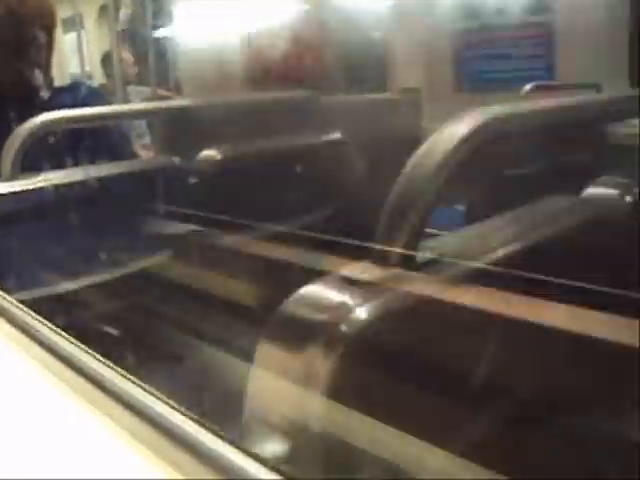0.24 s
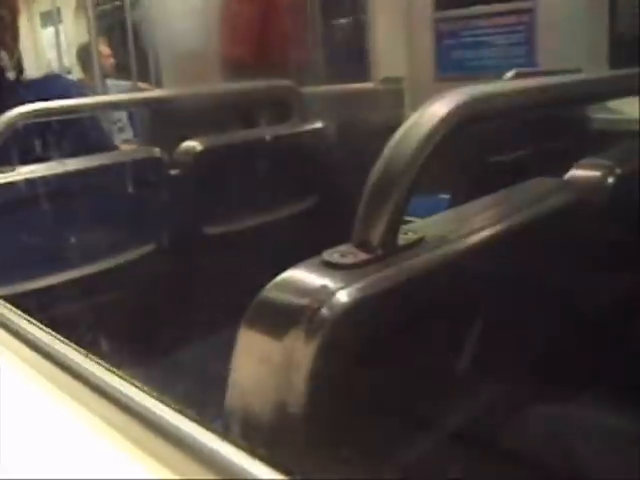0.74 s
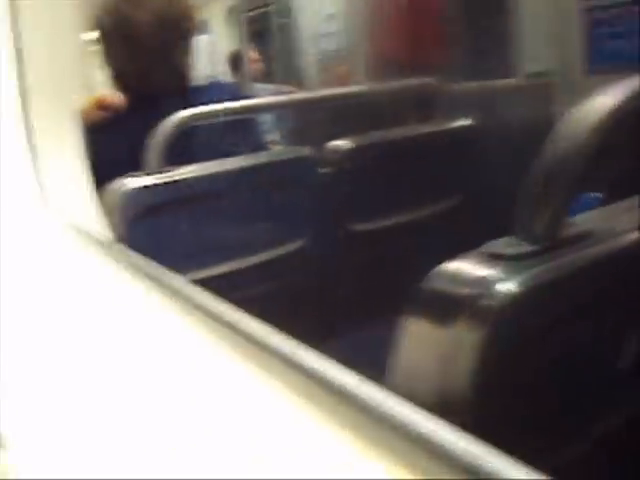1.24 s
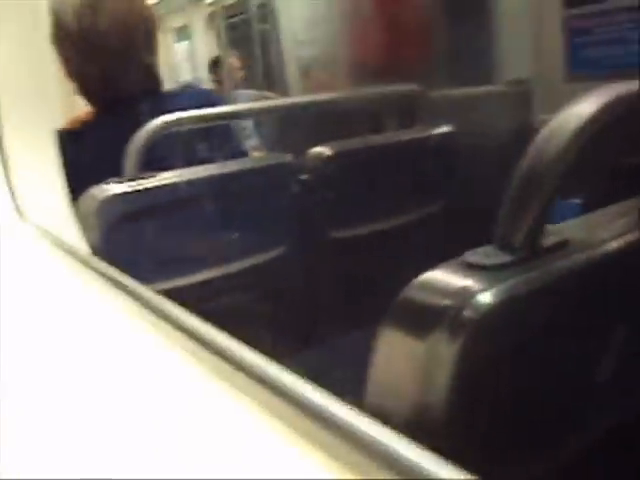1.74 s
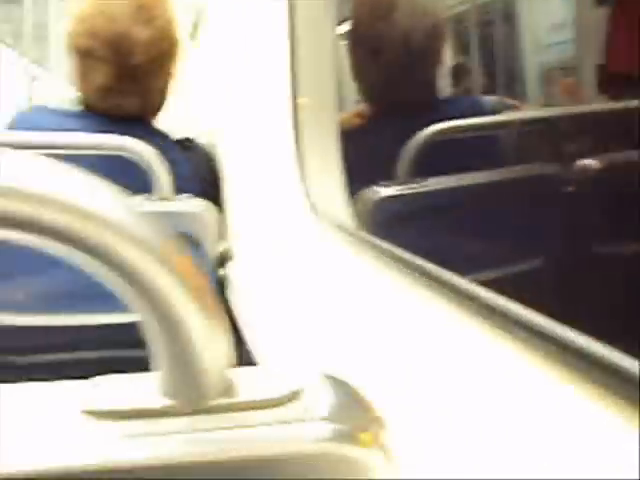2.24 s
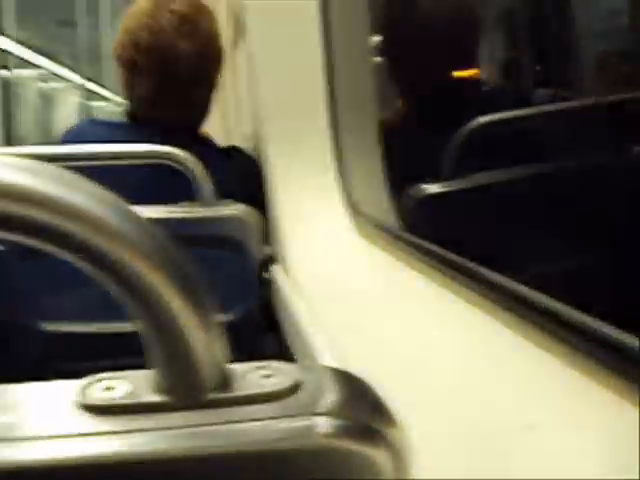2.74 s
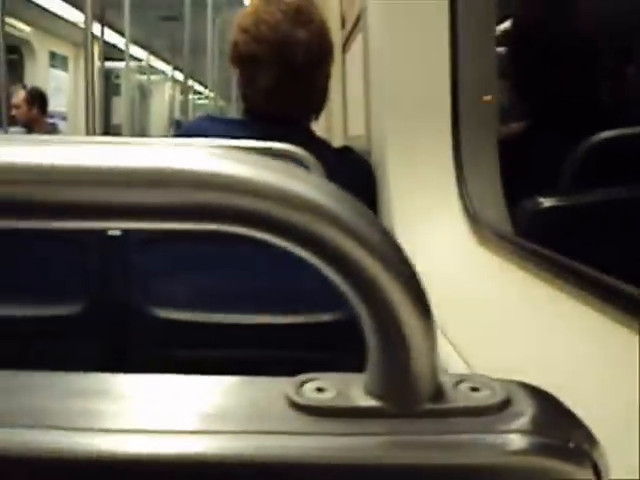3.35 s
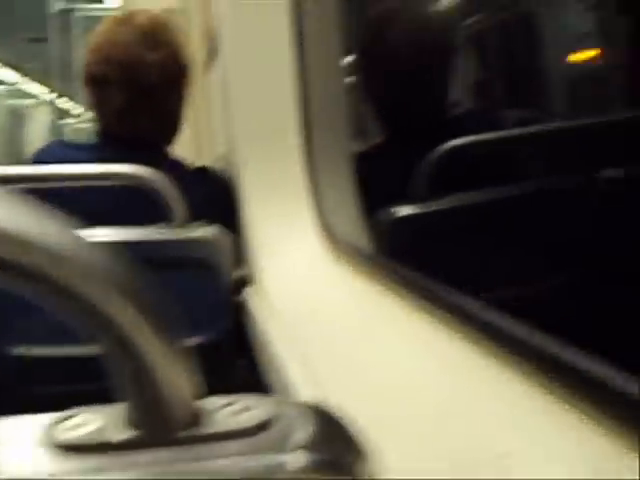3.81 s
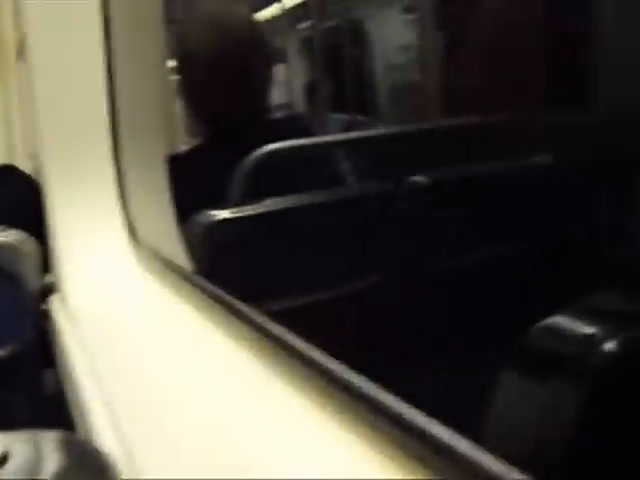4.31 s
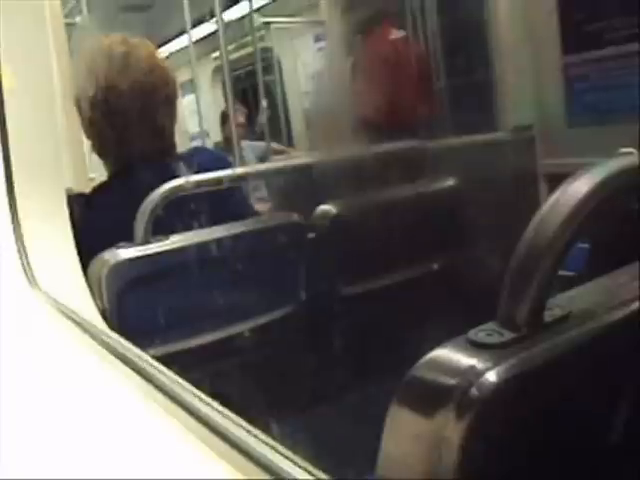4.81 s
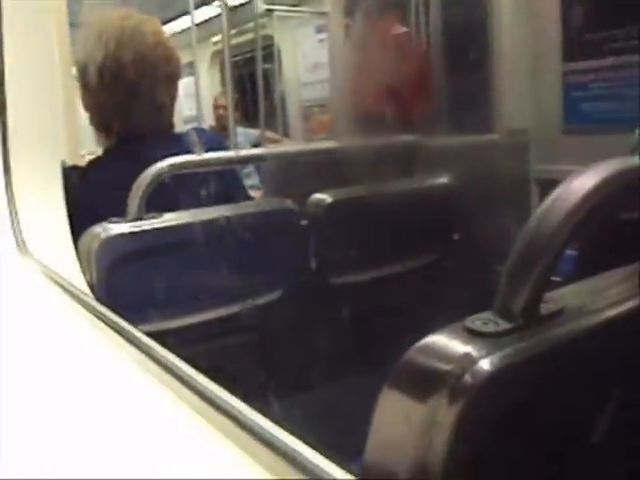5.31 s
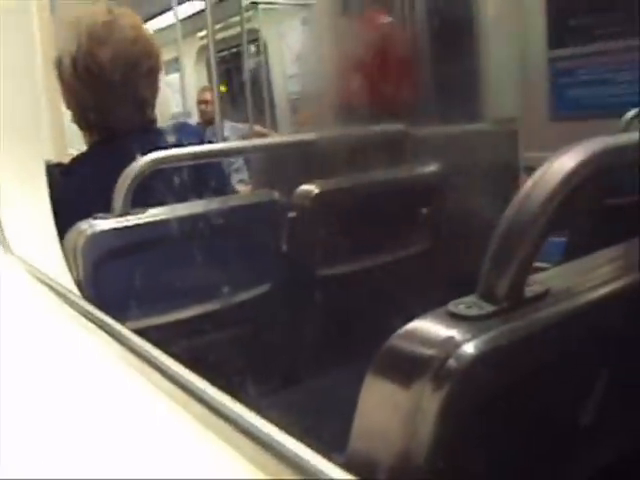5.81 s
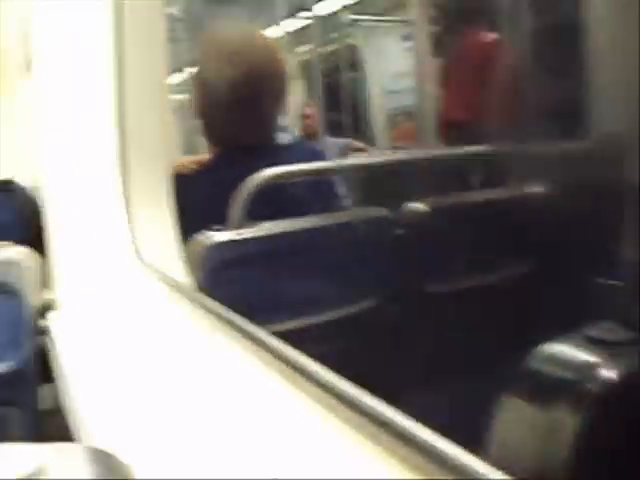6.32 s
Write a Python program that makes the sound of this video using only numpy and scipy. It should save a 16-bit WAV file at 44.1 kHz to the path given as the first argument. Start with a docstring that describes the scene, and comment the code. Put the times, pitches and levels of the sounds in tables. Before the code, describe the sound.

The interior of a subway car speeding through a tunnel, heard from a window seat. At 0 s a mid-low panel drone and muffled roar are already running, fluttering with a quick cluster of small jolts in the first half second. The sound dips slightly near 1 s, then builds; from about 1.8 s a hollow, wavering howl joins, with brighter rail hiss, staying prominent through 2-3 s and peaking near 3.7 s with a low thump. From about 4 s the howl recedes while the cabin boom surges, denser and louder, with hard jolts around 4.1, 4.3, 5.0, 5.8 and 6.4 s and heavy thumps near 4.4 and 5.5 s. Brief lulls make it uneven. The strained microphone crackles finely, with dry bursts mostly after 3.3 s, plus grain and thin sizzle. The ride is still loud when it cuts off around 6.6 s.

```python
"""Inside a subway car running through a tunnel, at a window seat: a booming ride that grows louder, with jolts.
Rolling noise excites the resonances of floor, wall panels and panes; roar, howl and hiss enter by the windows.
The bogies rumble below. Each source is filtered noise under a level curve; jolts and thumps add brief tones.
Loose fittings tick finely on the deep troughs of the wave; the strained recorder crackles in dry bursts as it
overloads; its microphone bends the wave, and its slow converter adds grain and a thin sizzle."""
import sys
import numpy as np
from scipy import signal
from scipy.fft import rfft, irfft
from scipy.io import wavfile
from scipy.ndimage import uniform_filter1d, map_coordinates

SR = 44100
rng = np.random.default_rng(int(sys.argv[2]) if len(sys.argv) > 2 else 0)


def pcm_store(signal):
    """Save signal as 16-bit PCM."""
    levels = np.round(np.clip(np.atleast_2d(signal), -1, 1) * 32767)
    wavfile.write(sys.argv[1], SR, levels.astype(np.int16).T)


N = 289296  # samples
TIME = np.arange(N) / SR  # s
HZ = np.fft.rfftfreq(N, 1 / SR)


def gain_of(db):
    """Decibel law: amplitude factor of a level."""
    return 10 ** (np.asarray(db) / 20)


def curve(points):
    """Linear interpolation: value at every moment from (time [s], value) points."""
    return np.interp(TIME, *np.transpose(points))


def shape(points):
    """Spectral envelope: gain at every frequency from (frequency [Hz], level [dB]) points."""
    hz, db = np.transpose(points)
    return gain_of(np.interp(np.log(HZ + 1), np.log(hz + 1), db, right=-100))


def ringing(modes):
    """Modal superposition: the powers of damped resonances add; amplitude halves one width off each centre."""
    power = sum((gain_of(db) / (1 + ((HZ - hz) / width) ** 2)) ** 2 for hz, width, db in modes)
    return np.sqrt(power)


def lowpass(corner_hz):
    """Gaussian low-pass gain, which makes noise into a slow random drift."""
    return np.exp(-(HZ / corner_hz) ** 2)


def noise(colour, steady_s):
    """Filtered white noise of power 1; dividing by its running RMS leaves only variation within steady_s."""
    x = irfft(rfft(rng.standard_normal(N)) * colour, N)
    size = max(int(steady_s * SR), 256)
    power = uniform_filter1d(uniform_filter1d(x ** 2, size), size)
    return x / np.sqrt(power + 1e-20)


def wandering(x, share, rate_hz):
    """Frequency modulation by a varying delay: the pitch drifts at random by a share of itself."""
    drift = noise(lowpass(rate_hz), steady_s=2.27)
    lag = np.cumsum(share * (drift - drift.mean()))  # samples
    return map_coordinates(x, [np.arange(N) + lag], order=1, mode="wrap")


def bump(s, length_s):
    """Raised-cosine envelope: a smooth rise to 1 at time s and back, length_s wide at half height."""
    return np.cos(np.pi / 2 * np.minimum(abs(TIME - s) / length_s, 1)) ** 2


def jolted(x, events, takeover):
    """Transient excitation: each bump replaces a share of the noise x by a tone of unsteady pitch."""
    wobble, wobble_hz = .055, 45  # share of the pitch, and rate
    clock = TIME + wobble * np.cumsum(noise(lowpass(wobble_hz), steady_s=0.1995)) / SR
    for s, hz, peak_db, length_s in events:
        surge = bump(s, length_s)
        tone = np.sin(2 * np.pi * (hz * clock + rng.random()))
        x = x * (1 - takeover * surge) + gain_of(peak_db) * surge * tone
    return x


# how hard the wheels roll: (time [s], level re the loud stretch [dB])
ROLLING = [(0, -9.5), (.35, -6.5), (1.0, -7.5), (1.4, -5), (2.05, -4), (2.35, -6.5), (2.65, -5),
           (3.1, -5.5), (3.5, -1.3), (3.75, -3), (4.1, 0), (5.2, 1.7), (5.65, 0), (6.3, 1.5), (6.56, -0.5)]


def driven(loud_db, slope):
    """Power law of level: a layer at loud_db in the loud stretch gains slope dB per dB of rolling."""
    return gain_of(loud_db + slope * curve(ROLLING))


# brief dips of the rumble: (time [s], change [dB], width at half height [s])
LULLS = [(0.165, -10, 0.015), (0.29, -6, 0.027), (0.61, -0.5, 0.021), (1.02, -1.5, 0.039),
         (1.284, -3, 0.031), (2.153, -2, 0.035), (2.896, -4.5, 0.056), (3.59, -1, 0.037),
         (3.884, -0.5, .035), (4.23, -1, 0.084), (4.73, -2.5, 0.095), (5.03, -0.5, 0.046),
         (5.3, -1.5, 0.027), (5.755, -7.5, 0.015), (6.264, -3.5, 0.05), (6.514, -10, 0.028)]


def lulls():
    """Amplitude modulation: change of level in dB at every moment, from the brief dips."""
    return sum(db * bump(s, length_s) for s, db, length_s in LULLS)


# colour of the trough crackle: (frequency [Hz], density [dB per Hz])
TROUGH_COLOUR = [(1000, -14), (2500, -3), (4000, 4), (5500, 3), (7000, -12)]


def trough_crackle(rumble):
    """One-sided excitation: loose fittings tick finely on the deep troughs of the wave, where the car swings
    hardest."""
    threshold = 1.3  # depth in units of the rumble's running RMS
    ticks_per_s, spread_db, decay_s = 420, 1.2, 0.0005  # mean rate, scale of the random sizes, decay
    depth = -rumble / np.sqrt(uniform_filter1d(rumble ** 2, size=SR // 2))
    excess = np.maximum(depth - threshold, 0) ** 2
    rate = ticks_per_s * excess / excess.mean()
    sizes = gain_of(spread_db * np.minimum(rng.exponential(1, N), 3))
    hits = (rng.random(N) < rate / SR) * sizes
    # each hit starts an exponential decay of power, filled with noise
    power = signal.lfilter([1], [1, -np.exp(-2 / (decay_s * SR))], hits ** 2 + 1e-18)
    ticks = irfft(rfft(np.sqrt(power) * rng.standard_normal(N)) * shape(TROUGH_COLOUR), N)
    return driven(loud_db=-62, slope=0.8) * ticks / np.std(ticks)


def add(mix, s, sound):
    """Linear superposition: mixes a sound in at time s."""
    part = mix[max(round(s * SR), 0):][:len(sound)]
    part += sound[:len(part)]


# bursts of dry crackle: (time [s], level at which the tail starts [dB], tail decay [s])
CRACKLES = [(1.341, -47, .004), (1.828, -46, .008), (2.335, -43, .008), (3.332, -38, .003),
            (3.348, -42, .003), (3.491, -43, .006), (3.965, -41, .004), (4.325, -38, .003),
            (4.331, -31, .0055), (4.605, -35, .0045), (4.993, -44, .006), (5.105, -40, .004),
            (5.346, -40, .006), (5.579, -41, .004), (5.785, -42, .006), (6.36, -38.5, .007),
            (6.376, -41, .007)]
# colour of a crackle: (frequency [Hz], density [dB per Hz])
CRACKLE_COLOUR = [(500, 11), (1500, 8), (3000, 1), (4200, -2), (5500, -2), (7000, -6)]


def crackles():
    """Overload with two decays: the recorder bursts into dry crackle, a sharp onset and a tail of equal start."""
    onset_s = 0.00037  # decay of the onset
    level, t = np.zeros(N), np.arange(SR // 10) / SR
    for s, tail_db, decay_s in CRACKLES:
        add(level, s, gain_of(tail_db) * (np.exp(-t / decay_s) + np.exp(-t / onset_s)))
    return level * noise(shape(CRACKLE_COLOUR), steady_s=.01)


# how hard the bogies shake, before the sway: (time [s], level [dB])
SHAKE_LEVEL = [(0, -37.5), (.9, -34.5), (1.4, -33.5), (2.2, -32), (2.75, -28), (3.2, -33), (3.6, -28.5),
               (4.5, -31), (5.6, -29.5), (6.56, -30.5)]
# colour of the rumble: (frequency [Hz], density [dB per Hz])
RUMBLE_COLOUR = [(5, -6), (24, -1), (42, 0.5), (58, 5), (75, -2.5), (98, 0.5), (125, -4), (160, -1.5),
                 (230, -23), (500, -57)]
# bumps that thump the bogies: (crest time [s], ring [Hz], peak [dB], width at half height [s])
THUMPS = [(3.685, 45.2, -23.5, 0.081), (4.438, 49.5, -19.5, 0.071), (5.501, 89.5, -14.5, 0.033),
          (5.756, 59.4, -22, 0.056)]


def bogies():
    """Sprung-mass vibration: low-frequency shaking swells once in each sway and thumps over bumps."""
    sway_s, crest_s, sway_db = 0.99, 3.55, 1.5  # period, time of one crest, swing either way
    sway = sway_db * np.cos(2 * np.pi * (TIME - crest_s) / sway_s)
    shake = gain_of(curve(SHAKE_LEVEL) + sway) * noise(shape(RUMBLE_COLOUR), steady_s=0.42)
    return jolted(shake, THUMPS, takeover=0.28)


# colour of the rail hiss: (frequency [Hz], density [dB per Hz])
HISS_COLOUR = [(700, -18), (1100, 2), (1220, 0.5), (1380, -2.5), (1550, -3), (2000, -8), (2500, -13.5),
               (3200, -20.5), (4000, -26.5), (5400, -30)]
# hiss of the rails, before grit and gusts: (time [s], level [dB])
HISS_LEVEL = [(0, -40.5), (.8, -41), (1.2, -42.5), (1.68, -36.5), (2.05, -38), (2.5, -34.5), (2.9, -38.5),
              (3.35, -35), (3.8, -37), (4.1, -33.5), (4.7, -36), (5.05, -34), (5.6, -35.5), (6.56, -33)]


def rail_hiss():
    """Broadband noise: the rails hiss at a level made gritty by slow random modulation."""
    grit_db = 1.0 * noise(lowpass(45), steady_s=.4)
    return gain_of(curve(HISS_LEVEL) + grit_db) * noise(shape(HISS_COLOUR), steady_s=0.1)


# resonances of the tunnel: (frequency [Hz], width [Hz], level [dB])
HOWL_MODES = [(742, 53, 0.5), (858, 104, -4.5)]
# howl of the tunnel, before gusts: (time [s], level [dB])
HOWL_LEVEL = [(0, -44), (1.1, -53), (1.8, -35), (2.15, -28.5), (2.8, -26.5), (3.1, -31.5), (3.7, -24),
              (4.2, -31), (6.56, -35.5)]


def howl():
    """Cavity resonance: noise through the tunnel's modes howls at a wavering pitch."""
    tone = noise(ringing(HOWL_MODES), steady_s=0.14)
    return gain_of(curve(HOWL_LEVEL)) * wandering(tone, share=.025, rate_hz=5)


# colour of the tunnel roar: (frequency [Hz], density [dB per Hz])
ROAR_COLOUR = [(300, -9.5), (450, -2.5), (560, 0.5), (630, 1.6), (665, 0.7), (730, 1), (820, -3.5),
               (900, -5.5), (980, -8), (1100, -14), (1400, -27.5), (2500, -41)]
# gusts: (time [s], change of roar and howl [dB], change of hiss [dB], width at half height [s])
GUSTS = [(0.102, 4.5, -0.5, 0.037), (0.353, 3, 0, 0.029), (1.688, 2.5, 1.5, 0.033), (1.8, 0, 2, 0.057),
         (2.126, 1, 1.5, .08), (2.27, -1.5, 0.5, 0.062), (2.794, 1.5, -1, 0.032), (3.117, 0.5, 0, .1),
         (3.357, 1, 0.5, 0.053), (3.685, -2.5, 0.5, 0.067), (4.18, 0.5, 0.5, 0.066), (4.46, 1.5, 0, 0.022),
         (5.704, -2, 0.5, 0.06), (6.275, 2.5, 1.5, 0.042)]


def tunnel():
    """Sound transmission: roar, howl and hiss enter by the windows in gusts."""
    roar = driven(loud_db=-20, slope=0.96) * noise(shape(ROAR_COLOUR), steady_s=0.11)
    roar_gust = gain_of(sum(db * bump(s, length_s) for s, db, _, length_s in GUSTS))
    hiss_gust = gain_of(sum(db * bump(s, length_s) for s, _, db, length_s in GUSTS))
    # a very slight random unsteadiness of level, shared by roar, howl and hiss
    unsteady_db = 0.05 * noise(1 / (1 + (HZ / 60) ** 2), steady_s=0.77)
    common = gain_of(unsteady_db + 0.18 * lulls())  # a small share of the dips is heard here
    return common * (roar_gust * (roar + howl()) + hiss_gust * rail_hiss())


# boom of the floor, before the trim: (time [s], level [dB])
BOOM_LEVEL = [(0, -28.5), (.9, -31), (1.3, -26), (1.8, -25), (2.8, -25), (3.45, -21.5), (3.8, -24),
              (4.15, -19.5), (4.65, -19), (5.0, -23.5), (5.8, -21.5), (6.3, -20.5), (6.56, -29)]
# drone of the wall panels, before the trim: (time [s], level [dB])
DRONE_LEVEL = [(0, -24), (0.2, -23), (0.8, -23), (1.0, -26), (1.8, -20.5), (2.05, -22), (2.3, -20.5),
               (2.65, -23), (3.15, -21.5), (3.85, -22), (4.0, -16.5), (4.75, -17), (4.97, -15.5),
               (5.15, -17), (5.55, -16), (6.2, -18), (6.4, -16.5), (6.56, -10.5)]
# resonances of floor, wall panels and window panes: (frequency [Hz], width [Hz], level [dB])
FLOOR_MODES = [(148, 38, -15.5), (221.6, 31.3, 0.5), (277.5, 35.5, 0)]
PANEL_MODES = [(312.3, 39, -3.5), (356, 40, 1.5), (399.4, 22.6, -1)]
PANE_MODES = [(496, 33, 0)]
# rough spots that ring the cabin: (crest time [s], ring [Hz], peak [dB], width at half height [s])
JOLTS = [(0.111, 340, -16, .02), (0.143, 347, -11, 0.014), (0.19, 376, -12.5, 0.015),
         (0.231, 330, -13.5, .022), (0.353, 358, -13, 0.013), (0.39, 350, -13, 0.011),
         (0.428, 357, -16, 0.022), (0.565, 347, -16, 0.029), (0.642, 338, -15, 0.016),
         (0.807, 324, -15, 0.042), (1.157, 343, -14.5, 0.019), (1.35, 343, -14.5, 0.018),
         (1.818, 298, -10.5, 0.017), (2.206, 375, -13, 0.032), (2.267, 331, -11.5, 0.014),
         (2.346, 360, -14, 0.023), (2.392, 332, -13.5, 0.027), (3.122, 295, -13.5, 0.043),
         (3.489, 305, -11, 0.02), (3.941, 235, -13, 0.017), (4.115, 285, -8, 0.014),
         (4.157, 242, -11.5, 0.026), (4.329, 341, -7.5, 0.012), (4.476, 362, -10.5, .028),
         (4.604, 297, -10, 0.017), (4.981, 356, -7.5, 0.042), (5.423, 380, -10.5, .03),
         (5.593, 355, -11.5, 0.026), (5.783, 333, -8, 0.023), (5.946, 310.4, -12, 0.029),
         (6.198, 216.3, -15, 0.045), (6.363, 326, -6.5, 0.036)]


def cabin():
    """Structure-borne sound: rolling rings floor, wavering panels and panes, with jolts and lulls."""
    drift, drift_hz = .018, 8  # share of the pitch, and rate
    floor_trim_db, panel_trim_db = 0.44, 0.3
    floor = wandering(noise(ringing(FLOOR_MODES), steady_s=0.086), drift, drift_hz)
    boom = gain_of(floor_trim_db + curve(BOOM_LEVEL)) * floor
    panels = wandering(noise(ringing(PANEL_MODES), steady_s=0.076), drift, drift_hz)
    drone = gain_of(panel_trim_db + curve(DRONE_LEVEL)) * panels
    # the panes gain faster than the rolling itself
    panes = driven(loud_db=-25, slope=1.38) * noise(ringing(PANE_MODES), steady_s=0.18)
    dips = gain_of(lulls())
    return jolted(dips * (boom + drone), JOLTS, takeover=.55) + dips * panes


def scene():
    """Superposition: all layers add, eased in and out over a few milliseconds."""
    ease = signal.windows.tukey(N, .001)
    rumble = cabin() + tunnel() + bogies()
    return (ease * (rumble + trough_crackle(rumble) + crackles()))[None]


def record(dry):
    """Nonlinear distortion and sample-and-hold imaging: a strained microphone feeds a slow, grainy converter."""
    lopsided, ceiling = .18, 0.78  # share of squared wave at full scale, and limit of the peaks
    hold = 4  # output samples per converter value: the steps mirror the sound near 11 kHz
    grain_db, grain_power = -34.0, 0.85  # before smoothing over one step; growth with the wave's swing
    bent = dry - lopsided * dry ** 2  # one half of the wave is squashed, the other stretched
    samples = bent[:, ::hold]
    samples = samples / (1 + (samples / ceiling) ** 10) ** (1 / 10)  # the tallest peaks are rounded off
    steps = np.repeat(samples, hold, axis=1)[:, :N]
    grain = gain_of(grain_db) * abs(steps) ** grain_power * rng.standard_normal(steps.shape)
    steps = steps + uniform_filter1d(grain, hold, axis=1)
    # two low-passes soften the steps
    soft = signal.sosfilt(signal.butter(7, 15300, fs=SR, output="sos"), steps)
    edge = signal.firwin(255, 14000, window=("kaiser", 9), fs=SR)
    return signal.oaconvolve(soft, edge[None], "same")


dry = scene()
out = record(dry)
pcm_store(out)
```